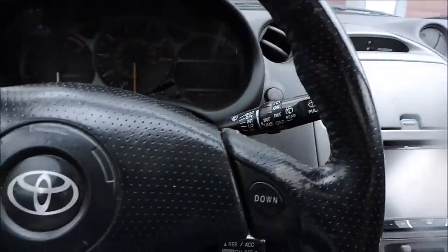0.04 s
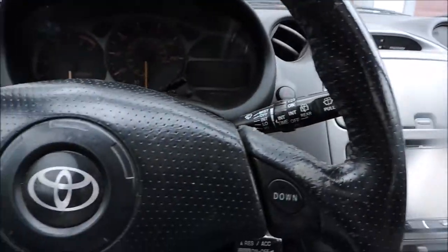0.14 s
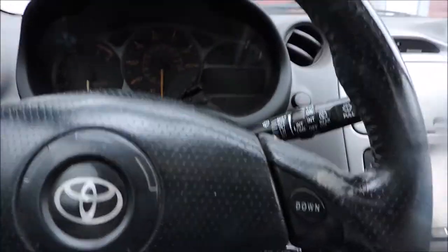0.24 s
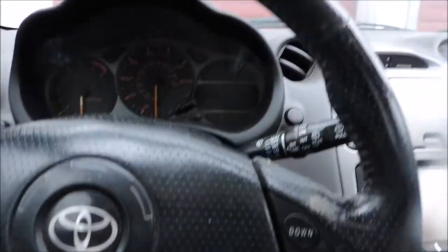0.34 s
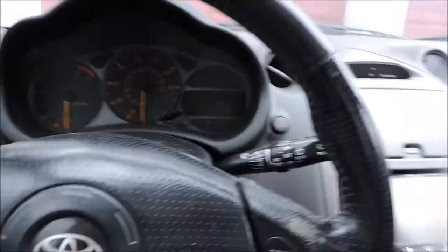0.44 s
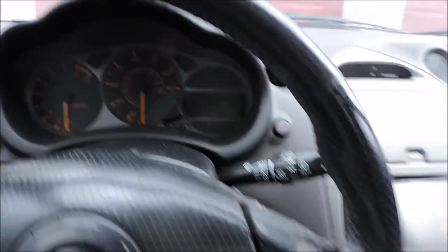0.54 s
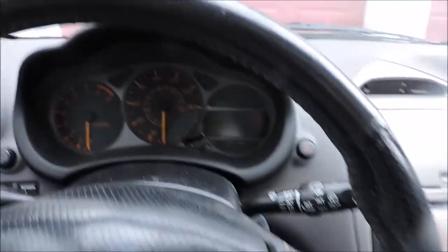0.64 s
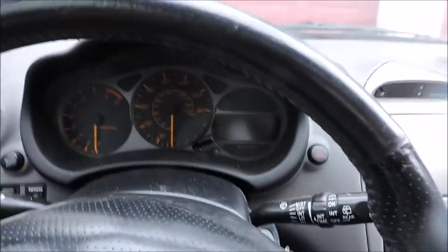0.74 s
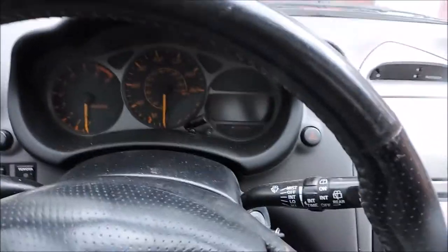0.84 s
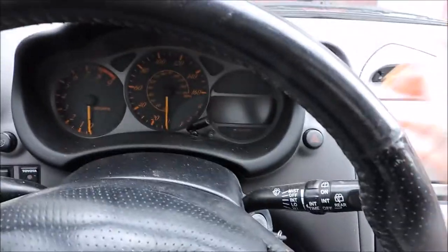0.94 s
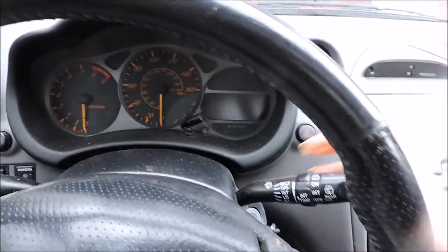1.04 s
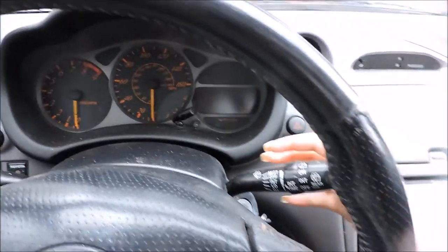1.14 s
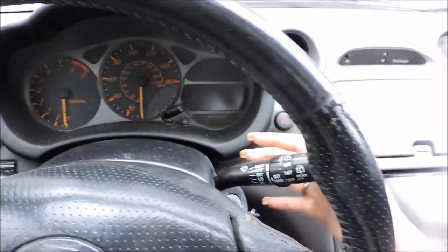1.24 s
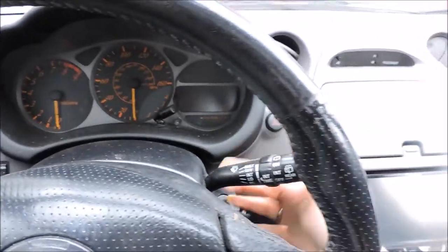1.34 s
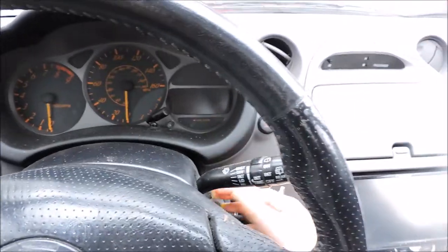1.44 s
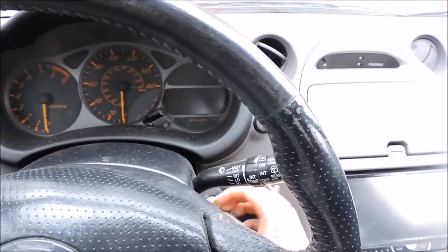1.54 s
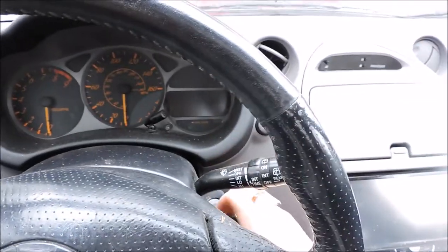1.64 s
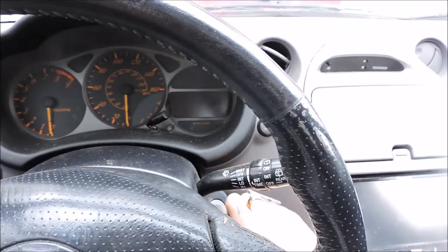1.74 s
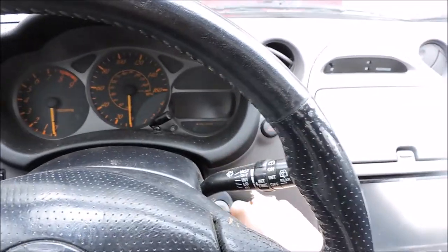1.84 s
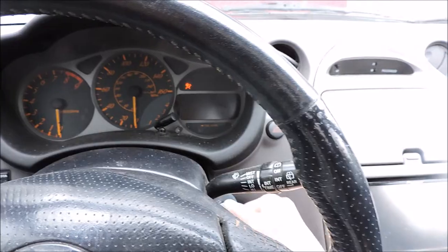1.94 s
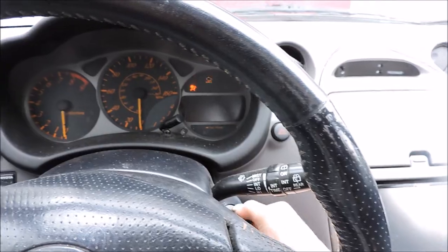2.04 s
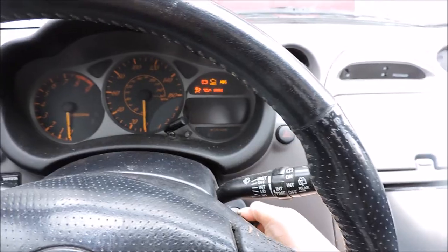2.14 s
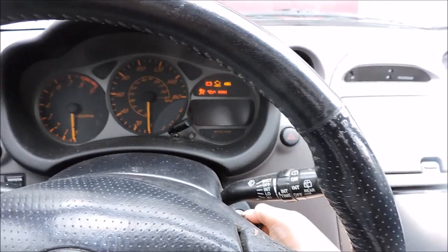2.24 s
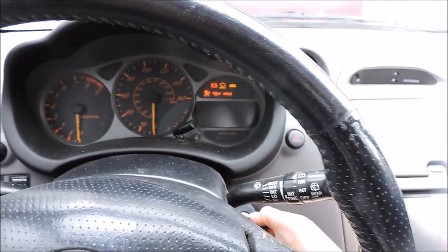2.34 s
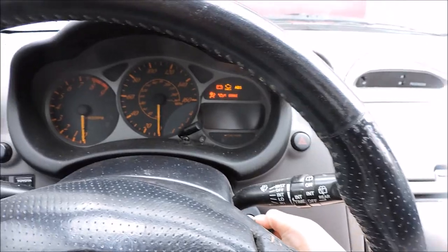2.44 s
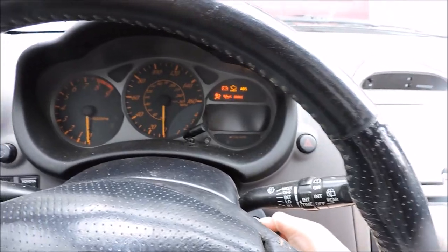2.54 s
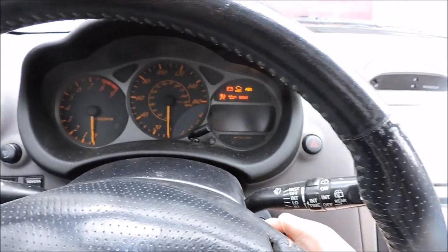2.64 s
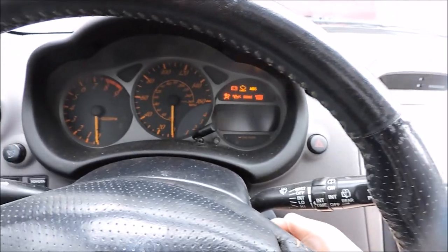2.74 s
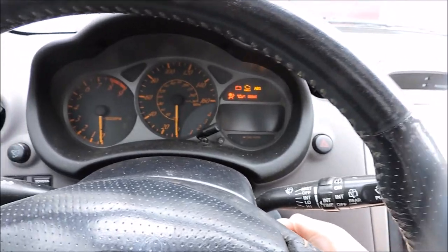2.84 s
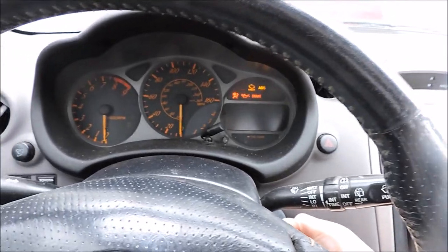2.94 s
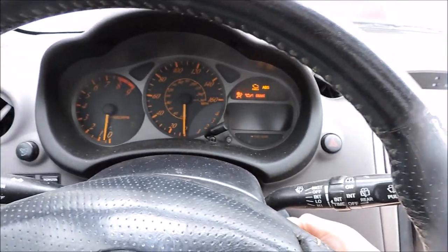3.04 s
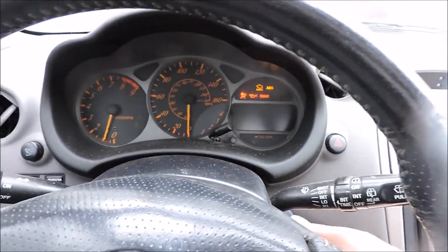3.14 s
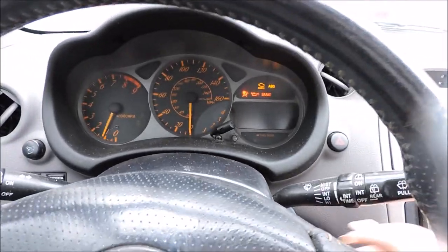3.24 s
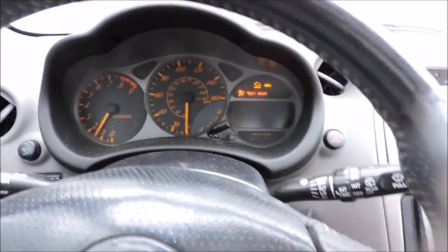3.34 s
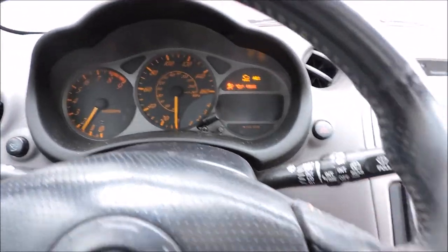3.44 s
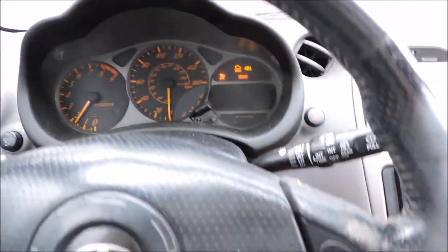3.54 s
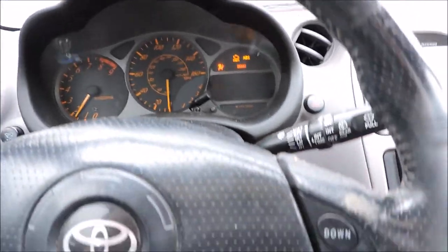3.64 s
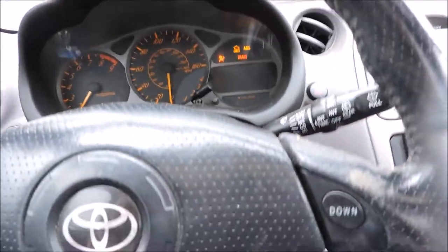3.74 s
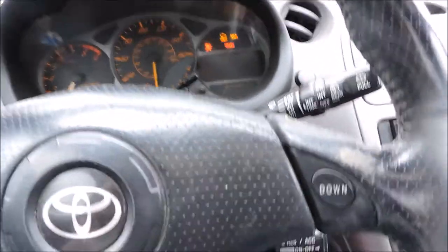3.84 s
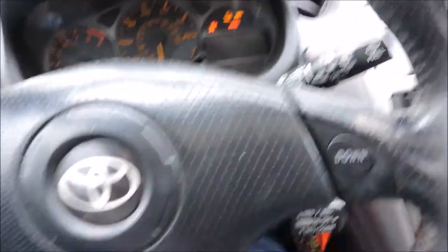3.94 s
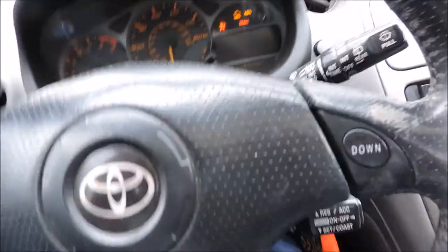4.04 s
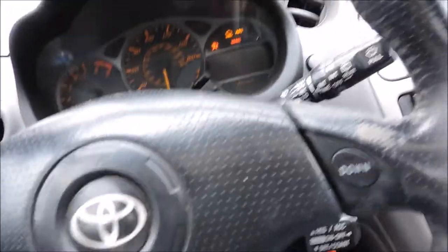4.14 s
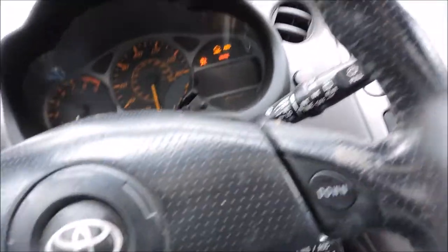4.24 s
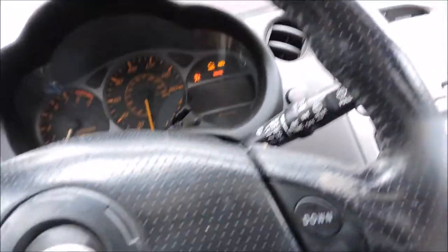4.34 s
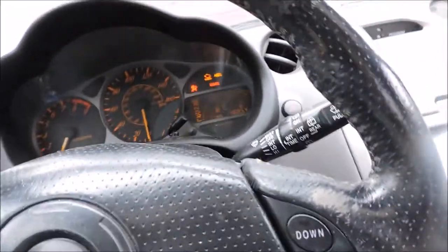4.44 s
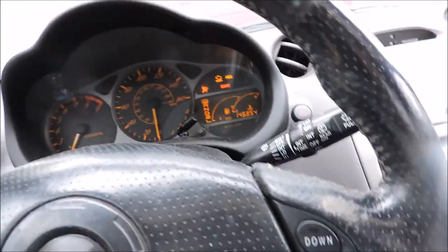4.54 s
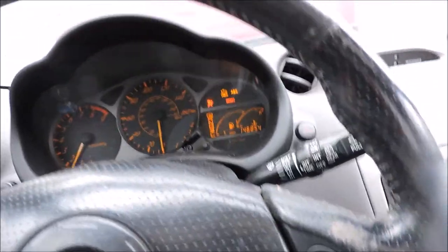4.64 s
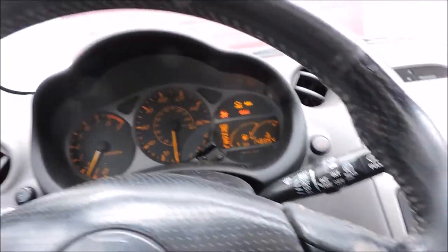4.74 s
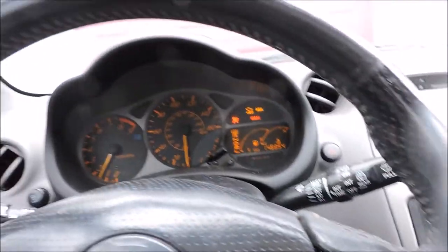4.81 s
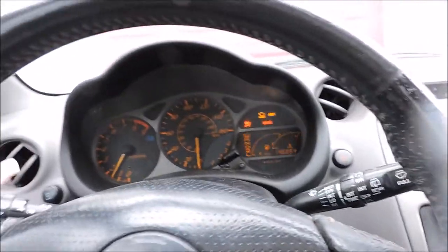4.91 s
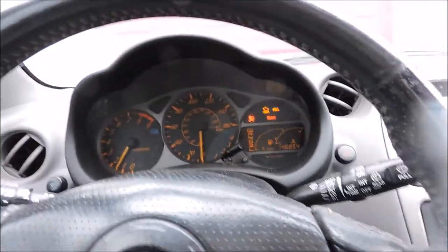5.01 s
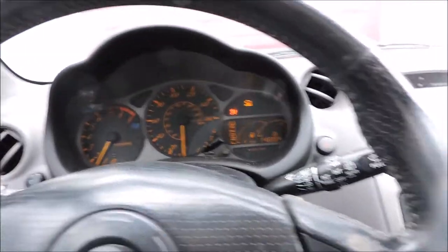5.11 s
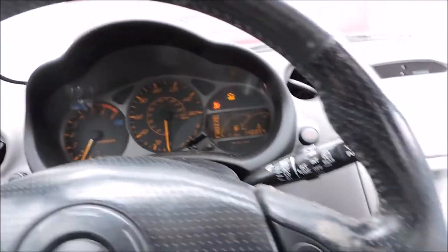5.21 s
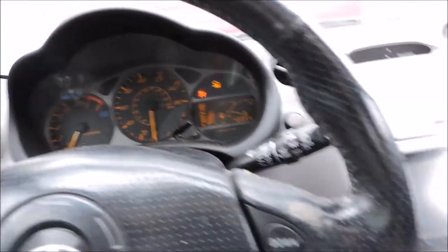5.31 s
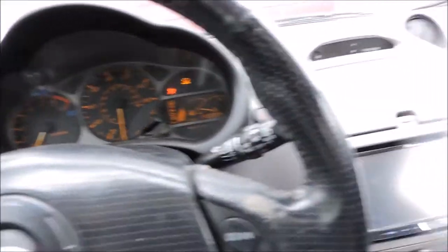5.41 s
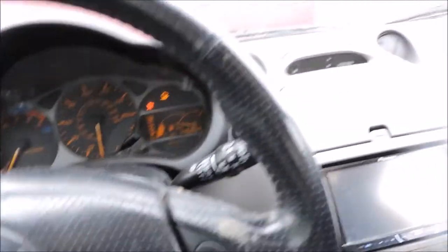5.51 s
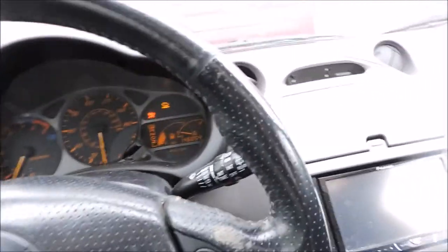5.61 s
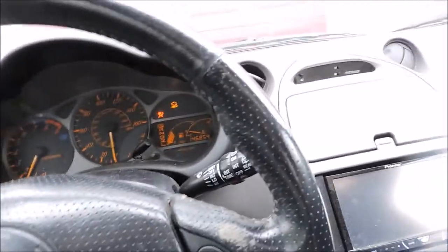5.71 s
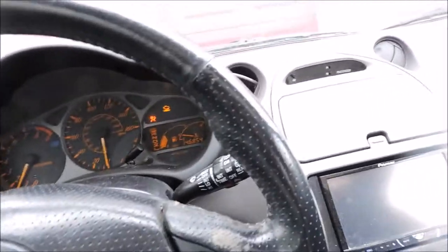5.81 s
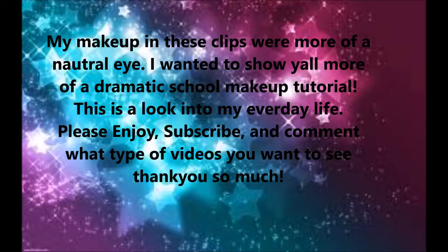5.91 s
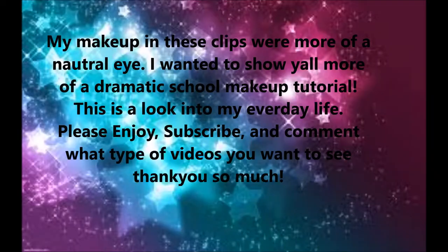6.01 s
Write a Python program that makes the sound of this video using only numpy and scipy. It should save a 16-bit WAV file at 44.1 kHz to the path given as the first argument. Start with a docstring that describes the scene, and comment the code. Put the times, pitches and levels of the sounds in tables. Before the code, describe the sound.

Inside a small parked car, a key clicks into the ignition, the starter cranks four growling strokes, and the engine catches, flares and settles to idle.

```python
"""Small car, cold start from inside

Inside a small car: a hand shifts on the microphone, a key goes into the ignition and the lock is turned.
The starter cranks four strokes; the four-cylinder engine catches, flares and sinks to idle.
The key bunch knocks and jingles against the steering column; the sound stops abruptly.
The engine is sums of firing orders and throbbing noise; contacts are noise bursts, swells and resonances."""
import sys
import numpy as np
from scipy import signal
from scipy.fft import rfft, irfft, next_fast_len
from scipy.io import wavfile

SR = 44100
rng = np.random.default_rng(int(sys.argv[2]) if len(sys.argv) > 2 else 0)


def persist_wave(psi):
    """Save psi, clipped to +-1, as 16-bit WAV."""
    counts = np.round(np.clip(psi, -1, 1) * 32767).astype(np.int16)
    wavfile.write(sys.argv[1], SR, np.atleast_2d(counts).T)


N = 267682
TIME = np.arange(N) / SR

# All levels in the tables are relative: the mix trims them further. Left-right levels are positive to the left.
# Lengths are half-widths of a bell-shaped swell; tilts act between 200 Hz and 10 kHz.

# Spectra of the noises, scaled to unit power when used: (frequency [Hz], level per Hz [dB])
HUSH_SPECTRUM = [(20, -3), (55, -4), (100, -10), (175, -7), (230, -18), (750, -17), (1200, -22),
                 (3000, -30), (16000, -48)]
SKIN_SPECTRUM = [(100, -5), (300, 1), (600, -4.5), (1400, -13.5), (3000, -28), (5500, -30.5), (7000, -42),
                 (16000, -55)]
CLOTH_SPECTRUM = [(900, -5), (2200, -11.5), (5600, -7.5), (6800, -17.5), (16000, -34)]
SLEEVE_HISS_SPECTRUM = [(1000, -20), (13000, 6), (16000, -10)]
MICROPHONE_CASE_SPECTRUM = [(150, -20), (662, -3.5), (1420, -6), (2300, -11), (4700, -12), (16000, -36.5)]
BUMP_SPECTRUM = [(40, -3), (90, -6.5), (170, 5.5), (400, -9), (900, -16), (3000, -52)]
PLASTIC_SPECTRUM = [(210, -10), (350, 3.5), (719, 7), (1190, -1), (3570, -13.5), (7650, -34), (13000, -62)]
METAL_SPECTRUM = [(710, -11.5), (1200, -7.5), (4000, -11.5), (10400, -19.5), (13000, -14), (16000, -29)]
LOCK_SPECTRUM = [(150, -10), (366, -12), (570, -4.5), (1050, -9.5), (3970, -11), (16000, -28)]
PINION_SPECTRUM = [(120, -59), (200, -9.5), (373, -2.5), (1650, -13), (2050, -15), (11900, -44.5),
                   (16000, -48)]
STARTER_SPECTRUM = [(130, -66), (220, -14.5), (334, 7), (562, -9), (1010, -14.5), (1270, -22), (2370, -25),
                    (12000, -68), (22000, -120)]
SHAKE_SPECTRUM = [(12, -18), (22, 24.5), (33, 25), (55, -7.5), (120, -41.5)]
COMBUSTION_SPECTRUM = [(40, -28), (85, -5), (140, 1.5), (200, -8), (400, -15.5), (600, -35), (1200, -77)]
CLATTER_SPECTRUM = [(200, -1.5), (450, 7.5), (750, 7.5), (1500, -3.5), (2600, -8), (5600, -24),
                    (7000, -28.5), (15000, -59)]

# Diffuse sound in the cabin: (frequency [Hz], left-right likeness [0 to 1, below 0 counts as 0])
LIKENESS = [(100, 0.96), (300, 0.79), (1000, 0.59), (8000, -0.51)]
# Hollows of the cabin that colour its hush: (frequency [Hz], width [Hz], level [dB])
HOLLOWS = [(766, 24, 3), (2570, 58, -6)]
# Well damped microphone case: (frequency [Hz], width [Hz], level [dB])
MICROPHONE_CASE_MODES = [(660, 60, -9), (1640, 110, -0.5), (2960, 150, -7.5)]
# Column trim: (frequency [Hz], width [Hz], level [dB])
TRIM_MODES = [(735, 54, -5), (997, 21, -12.5), (1374, 123, 1), (1733, 145, -4.5)]
# Key swinging free: (frequency [Hz], width [Hz], level [dB])
KEY_MODES = [(9000, 78, 17.5), (13300, 80, 8), (14560, 220, 8)]
# Engine on its mounts: (frequency [Hz], level [dB], t60 [s])
MOUNT_MODES = [(31, 4, 0.22)]
# Cabin air that the first firings set ringing: (frequency [Hz], level [dB], t60 [s])
CABIN_AIR_MODES = [(167.3, -7.5, 0.31), (81.2, -0.5, 0.26), (277, -6, 0.071)]
# What the cabin passes of the upper engine orders: (frequency [Hz], level [dB])
DRONE = [(100, 5.5), (192, 8), (222, -7), (268, -3), (325, -8), (385, -8), (432, -1), (475, -12),
         (525, -7.5), (600, -20)]

# High treble of nearby sounds, stronger on the right at first, nearly even from 4.5 s:
# (time [s], left-right level [dB])
TREBLE_SIDE = [(3.7, -9), (4.5, -1)]
# Fingers rubbing beside the left microphone port: (time [s], length [s], level [dB], tilt [dB per octave])
RUBS = [(0.288, 0.066, -46.5, -1), (0.366, 0.12, -53.5, 0), (0.556, 0.051, -45.5, 0.5),
        (0.641, 0.043, -49, 0.5), (0.84, 0.099, -52, -0.5), (0.88, 0.013, -47, 0.5)]
# The fingers catch and let go as they rub: (time [s], level [dB])
CATCHES = [(.533, -38), (.553, -30), (.650, -40)]
# The grip creaking on the microphone case: (time [s], level [dB], tilt [dB per octave])
CREAKS = [(3.7792, -11.5, 0.5), (3.7995, -15.5, -0.5), (3.816, -17.5, 2), (3.947, -37.5, -1.5)]
# Soft bumps through the car body: (time [s], level [dB])
BUMPS = [(5.2065, -30.5), (5.562, -37.5)]
# Cloth swishing: (time [s], length [s], level [dB])
SWISHES = [(.12, 0.27, -63.5), (.26, 0.081, -54), (3.755, 0.032, -50), (4.0, 0.048, -52)]
# Sleeve sliding over the column trim:
# (time [s], length [s], level [dB], hiss level [dB], left-right level without the hiss [dB])
SLIDES = [(0.384, 0.038, -33.5, -58, 9.5), (1.531, 0.056, -44, -68, 4.5), (5.151, 0.21, -48, -77, 1),
          (5.419, 0.23, -45, -65.5, 0.5)]

# Key fob and hand knocking on the column trim:
# (time [s], level [dB], tilt [dB per octave], pitch of the spot [Hz])
KNOCKS = [(1.408, -24.5, 0.4, 1040), (1.473, -42, 1.5, 1250), (3.336, -26, 0, 1380),
          (3.352, -32, 2.5, 1520), (3.473, -28.5, 0.5, 660), (3.518, -30, 2, 1379),
          (3.532, -27.5, -3, 1380), (3.861, -30.5, 0, 1020), (4.299, -41.5, 0.5, 746),
          (4.506, -33.5, 0, 1290), (4.534, -38.5, 3, 1750), (4.615, -24.5, 0, 516), (4.775, -44, -1, 755.7),
          (5.468, -43, 2.5, 1450), (5.562, -39, 0.5, 870), (5.726, -44.5, -1, 1800)]
# Keys clicking on each other: (time [s], level [dB])
TICKS = [(1.362, -46.5), (1.4034, -39), (1.4092, -32), (1.5184, -39.5), (1.6428, -35), (1.6754, -39.5),
         (3.1508, -27), (3.2571, -41), (3.5932, -32), (3.914, -48.5), (3.975, -55), (4.6094, -26.5),
         (4.7711, -33), (4.832, -42)]
# The lock's springs and detents and the dashboard latches snap over: (time [s], level [dB])
CLACKS = [(1.9525, -23.5), (1.960, -18.5), (2.014, -21), (4.617, -37)]
# The key grinds over the lock's pins as it seats and turns: (time [s], length [s], level [dB])
CRUNCHES = [(1.805, 0.053, -56.5), (1.922, 0.015, -39.5), (1.96, 0.041, -41), (2.018, 0.023, -37)]
# One key swinging free: (time [s], level [dB])
JINGLES = [(3.338, -59), (3.495, -61), (3.527, -52.5)]

# Starter pinion grinding into the ring gear, duller as it seats:
# (time [s], length [s], level [dB], tilt [dB per octave])
MESHING = [(2.159, 0.024, -44, 3), (2.203, 0.046, -38.5, 0.5), (2.247, 0.025, -38.5, -4)]
# The pinion strikes the ring gear, slams home and lashes as the engine overtakes it: (time [s], level [dB])
SLAMS = [(2.14, -50.5), (2.187, -37), (2.268, -35.5), (2.766, -43)]
# The starter spins free as the engine overtakes it: (time [s], length [s], level [dB])
WHIRRS = [(2.98, 0.53, -59.5)]

# Engine speed while cranking and catching: (time [s], firing rate [per s])
CRANK_SPEED = [(2.7, 9.6), (2.82, 21.7), (3.03, 33.7)]
# Engine speed once running: (time [s], firing rate [per s])
RUN_SPEED = [(3.08, 45), (3.2, 52), (3.32, 54.4), (3.49, 57), (3.62, 56.6), (3.91, 53.7), (4.42, 49.2),
             (5.2, 47.3), (5.9, 48.9)]
# Load on the engine (cranking, flare, throttling back, idle): (time [s], level [dB])
LOAD = [(2.78, -57.5), (2.88, -45), (3.05, -41), (3.3, -40), (3.72, -45), (4.15, -56.5), (4.45, -50.5),
        (5.9, -49.5)]
# Boom in the cabin at one, two and three times the firing rate; the third swells in the flare:
# (time [s], first level [dB], second level [dB], third level [dB])
BOOM = [(2.95, -59, -43, -44), (3.08, -49, -47, -45), (3.15, -33, -33.5, -29), (3.3, -50, -35, -29.5),
        (3.39, -37, -40.5, -39.5), (3.5, -34.5, -44, -49.5), (3.75, -53.5, -47, -42),
        (3.9, -58, -77, -46.5), (4.07, -37, -61, -48), (4.2, -37.5, -56, -57), (4.4, -36, -46.5, -45),
        (5.9, -35.5, -56, -47.5)]
# First uneven firings: (time [s], kick to the mounts [dB], thud into the cabin [dB])
FIRINGS = [(2.851, -46, -39), (2.870, -52, -30), (2.908, -25.5, -39), (2.947, -47, -27),
           (3.008, -23.5, -29), (3.036, -27.5, -27.5), (3.068, -27, -29), (3.1, -42, -41)]

# Cabin and microphone
HUSH_DB, CABIN_T60_S, STOP_S = -62.5, 0.11, 5.948
TREBLE_HZ, PORT_LEAK_HZ, CUTOFF_HZ = 8650, 54, 16000

# Hand, keys and lock; each creak catches again after a gap, at a changed level
CREAK_T60_S, TICK_T60_S, CLACK_T60_S = 0.045, 0.011, 0.045
RESLIP_S, RESLIP_DB = 0.0045, -3.5
KNOCK_WIDTH_HZ, KNOCK_RING_DB = 160, -4

# Compression strokes load the starter, each harder and higher than the one before
ENGAGE_S = 2.16
FIRST_STROKE_S, STROKE_GAP_S, STROKE_LENGTH_S = 2.424, 0.117, 0.047
FIRST_STROKE_DB, STROKE_GAIN_DB, STROKE_TILT_DB = -40.5, 1.64, 1.5
STROKE_RISE = 0.0488   # share by which the pitch climbs with each stroke
GEAR_HZ, GEAR_DB, GEAR_SAG_HZ_PER_S = 327, -7, 390   # pitch in the middle of the second stroke

# Engine
FIRST_BOOM_DB, BURN_DB, DRONE_DB, CLATTER_DB = 3, 2, -6.5, -7.5
ORDER_WAVER_DB, DRONE_WAVER_DB, DRONE_JITTER = 1.1, 2, .02
ORDER_SCATTER = 0.57   # the orders leave each firing in step; the cabin scatters their phases [radians]
# The engine rocks more on its mounts once it idles
SHAKE_DB, IDLE_SHAKE_DB, SETTLE_S, SETTLE_LENGTH_S = 4, 6.5, 3.52, 0.36
# Half orders at full load [dB], and their fall per dB of load taken off
UNEVEN_DB, UNEVEN_FALL = -14, 0.7
# The intake growls: orders near its pitch gain extra dB per dB of load above idle
INTAKE_SWELL, INTAKE_HZ, INTAKE_WIDTH_HZ = 1.1, 295, 90


def from_db(db):
    """Decibels to gain."""
    return 10 ** (np.asarray(db) / 20)


def rms_one(x):
    """Scale to unit power."""
    return x / np.sqrt(np.mean(x ** 2) + 1e-20)


def in_time(rows):
    """Each column of a curve at every sample."""
    times, *columns = np.transpose(rows)
    return [np.interp(TIME, times, column) for column in columns]


def at_hz(points, hz):
    """Read a spectrum on a log-frequency axis."""
    point_hz, level_db = np.array(points).T
    return np.interp(np.log(hz + 1e-3), np.log(point_hz), level_db)


def panned(pan_db):
    """Left and right gains, positive to the left."""
    return from_db(np.array([[.5], [-.5]]) * pan_db)


def drift(rate):
    """Random wander of spread 1, with a new target `rate` times a second."""
    knots = rng.standard_normal(4000)
    return rms_one(np.interp(TIME * rate, np.arange(len(knots)), knots))


def noise(size):
    """Diffuse stereo noise, alike at both ports in the bass and unrelated in the treble."""
    mid, side = rfft(rng.standard_normal((2, size)))
    alike = np.clip(at_hz(LIKENESS, np.fft.rfftfreq(size, 1 / SR)), 0, 1)
    common = np.sqrt((1 + alike) / 2) * mid
    opposed = np.sqrt((1 - alike) / 2) * side * [[1], [-1]]
    return irfft(common + opposed, size)


def colour(x, spectrum, tilt_db=0):
    """Causal (minimum-phase) filter of unit power gain, tilted in dB per octave."""
    size = 2 * next_fast_len(x.shape[-1] // 2 + 1)
    hz = np.fft.rfftfreq(size, 1 / SR)
    octaves = np.log2(np.clip(hz, 200, 10000))
    gain = rms_one(from_db(at_hz(spectrum, hz) + tilt_db * octaves))
    # folding the cepstrum to positive time gives the minimum phase
    cepstrum = irfft(np.log(gain + 1e-6))[:size // 2]
    cepstrum[1:] *= 2
    response = np.exp(rfft(cepstrum, size))
    return irfft(rfft(x, size) * response)[:, :x.shape[-1]]


def resonate(x, hz, width_hz):
    """A resonance of gain 1 on top."""
    r = np.exp(-np.pi * width_hz / SR)
    zeros = np.array([1, 0, -1]) * (1 - r * r) / 2
    poles = [1, -2 * r * np.cos(2 * np.pi * hz / SR), r * r]
    return signal.lfilter(zeros, poles, x + 1e-18)


def through(x, modes):
    """Resonances in parallel."""
    return sum(from_db(db) * resonate(x, hz, width) for hz, width, db in modes)


def add(out, s, sound):
    """Mix a short sound in at time s."""
    at = max(0, round(s * SR))
    out[:, at:at + sound.shape[-1]] += sound[..., :N - at]


def blows(rows, spectrum, t60, cabin_db):
    """Each blow is a short crack with the diffuse tail of the cabin; a third column tilts its colour."""
    out, t = np.zeros((2, N)), TIME[:SR // 4]
    for s, level_db, *tilt_db in rows:
        crack = from_db(-60 * t / t60)
        tail = from_db(cabin_db - 60 * t / CABIN_T60_S)
        burst = noise(len(t)) * np.hypot(crack, tail)
        add(out, s, from_db(level_db) * colour(burst, spectrum, *tilt_db))
    return out


def scrapes(rows, spectrum, grain_db, slips_per_s):
    """Swells of friction, each made of many uneven slips."""
    out, grain = np.zeros((2, N)), rms_one(from_db(grain_db * drift(slips_per_s)))
    for s, length, level_db, tilt_db, pan_db in rows:
        start = max(0, round((s - .25) * SR))
        span = slice(start, start + SR // 2)
        swell = np.exp(-2 * ((TIME[span] - s) / length) ** 2) * grain[span]
        rough = colour(noise(len(swell)) * swell, spectrum, tilt_db)
        add(out, start / SR, from_db(level_db) * panned(pan_db) * rough)
    return out


def struck(rows, modes, spread_db):
    """Every blow rings all modes as dying sines, each with a strength of its own."""
    out, t = np.zeros((2, N)), TIME[:SR // 3]
    for s, level_db in rows:
        for hz, mode_db, t60 in modes:
            strength_db = level_db + mode_db + spread_db * rng.standard_normal()
            add(out, s, from_db(strength_db - 60 * t / t60) * np.sin(2 * np.pi * hz * t))
    return out


def doubled(rows, gap_s, change_db):
    """Give every contact a second one, gap_s later and changed in level."""
    return list(rows) + [(s + gap_s, level_db + change_db, *rest) for s, level_db, *rest in rows]


def voiced(rows, tilt_db, pan_db):
    """Give swells one common colour and place."""
    return [(*row, tilt_db, pan_db) for row in rows]


def at_ports(x, pan_db):
    """Place a nearby sound at the microphone ports; its high treble has a side of its own."""
    high_pass = signal.butter(4, TREBLE_HZ, "high", fs=SR, output="sos")
    treble = signal.sosfiltfilt(high_pass, x)
    side_db, = in_time(TREBLE_SIDE)
    return (x - treble) * panned(pan_db) + from_db(-1.0) * treble * panned(side_db)


def cabin_hush():
    """The hush of the parked car: steady coloured noise, sinking in level, coloured by the cabin's hollows."""
    raised_db, = in_time([(2.2, 7.4), (4.1, 0.31)])
    hush = from_db(HUSH_DB + raised_db) * colour(noise(N), HUSH_SPECTRUM) * panned(2.85)
    return hush + through(hush, HOLLOWS)


def handling():
    """Friction at the left port and its case, cloth nearby, and bumps that come through the car body."""
    slips = doubled(CREAKS, RESLIP_S, RESLIP_DB)
    creak = blows(slips, MICROPHONE_CASE_SPECTRUM, t60=CREAK_T60_S, cabin_db=-41.0)
    ringing = through(creak, MICROPHONE_CASE_MODES)
    case = at_ports(from_db(-13.5) * creak + from_db(-3.0) * ringing, pan_db=15.0)
    bumps = from_db(2.5) * blows(BUMPS, BUMP_SPECTRUM, t60=0.06, cabin_db=-6.5)
    rubs = scrapes([(*row, 21) for row in RUBS], SKIN_SPECTRUM, grain_db=2.0, slips_per_s=270)
    catches = from_db(-7.5) * blows(CATCHES, SKIN_SPECTRUM, t60=0.022, cabin_db=-25) * panned(27.4)
    swishes = voiced(SWISHES, tilt_db=-1.5, pan_db=14.0)
    cloth = scrapes(swishes, CLOTH_SPECTRUM, grain_db=2.5, slips_per_s=480)
    return case + bumps + rubs + catches + cloth + sleeve_slides()


def sleeve_slides():
    """The sleeve's friction sets the column trim ringing, under a hiss of the cloth."""
    slides = [(s, length, db, 2.5, pan_db) for s, length, db, _, pan_db in SLIDES]
    sleeve = scrapes(slides, PLASTIC_SPECTRUM, grain_db=2.0, slips_per_s=240)
    hisses = voiced([(s, length, db) for s, length, _, db, _ in SLIDES], tilt_db=-7, pan_db=-5)
    hiss = scrapes(hisses, SLEEVE_HISS_SPECTRUM, grain_db=2.0, slips_per_s=410)
    return hiss + from_db(-11.5) * sleeve + from_db(-4.5) * through(sleeve, TRIM_MODES)


def keys():
    """Hollow knocks on the trim, each spot with its own pitch; bright clicks, the lock and a jingling key."""
    each_knock = [blows([row[:3]], PLASTIC_SPECTRUM, t60=0.03, cabin_db=-0.5) for row in KNOCKS]
    spots = sum(resonate(knock, row[3], KNOCK_WIDTH_HZ) for knock, row in zip(each_knock, KNOCKS))
    knocks = sum(each_knock)
    out = from_db(-11.5) * knocks + from_db(-3.5) * through(knocks, TRIM_MODES)
    out += from_db(KNOCK_RING_DB) * spots
    out += from_db(-6) * blows(TICKS, METAL_SPECTRUM, t60=TICK_T60_S, cabin_db=-6.0)
    out += from_db(-7) * blows(CLACKS, LOCK_SPECTRUM, t60=CLACK_T60_S, cabin_db=-3.5)
    crunches = voiced(CRUNCHES, tilt_db=-2, pan_db=2)
    out += scrapes(crunches, LOCK_SPECTRUM, grain_db=0.0, slips_per_s=600)
    jingle = blows(JINGLES, METAL_SPECTRUM, t60=0.26, cabin_db=-12)   # chatters into the key's modes
    return at_ports(out + jingle + through(jingle, KEY_MODES), pan_db=1.5)


def gear_tone(s, length, level_db, pitch):
    """The hum of the starter's teeth, sagging as the compression stroke slows it."""
    t = TIME[:SR // 4] - 1 / 8
    phase = 2 * np.pi * np.cumsum(GEAR_HZ * pitch - GEAR_SAG_HZ_PER_S * t) / SR
    teeth = sum(np.sin(k * phase) / k ** 1.5 for k in range(1, 7))
    swell = np.exp(-2 * (t / length) ** 2)
    out = np.zeros((2, N))
    add(out, s + t[0], from_db(level_db + GEAR_DB) * swell * teeth)
    return out


def starter(count=4):
    """The pinion grinds in; the gears growl harder and higher on every compression stroke, and spin free."""
    growl = 0
    for k in range(count):
        level_db = FIRST_STROKE_DB + k * STROKE_GAIN_DB
        stroke = (FIRST_STROKE_S + k * STROKE_GAP_S, STROKE_LENGTH_S, level_db)
        pitch = (1 + STROKE_RISE) ** (k - 1)
        gears = [(hz * pitch, db) for hz, db in STARTER_SPECTRUM]
        rasp = scrapes([(*stroke, STROKE_TILT_DB, 2.0)], gears, grain_db=2.5, slips_per_s=230)
        growl = growl + gear_tone(*stroke, pitch) + from_db(-3.0) * rasp
    grind = scrapes([(*row, 1.5) for row in MESHING], PINION_SPECTRUM, grain_db=1.5, slips_per_s=1000)
    spins = voiced(WHIRRS, tilt_db=-2.5, pan_db=4.0)
    whirr = scrapes(spins, CLOTH_SPECTRUM, grain_db=3.0, slips_per_s=740)   # a hiss as soft as cloth
    slams = blows(SLAMS, PINION_SPECTRUM, t60=0.12, cabin_db=-18)
    jolts = from_db(-6) * struck(SLAMS, MOUNT_MODES, spread_db=1)   # each slam rocks the engine on its mounts
    return growl + grind + slams + jolts + whirr


def first_firings():
    """Until the engine runs evenly, each firing is a separate kick to the mounts and thud in the cabin air."""
    kicks = struck([(s, db) for s, db, _ in FIRINGS], MOUNT_MODES, spread_db=1.5)
    thuds = struck([(s, db) for s, _, db in FIRINGS], CABIN_AIR_MODES, spread_db=5.0)
    return kicks + thuds


def firing_boom(phase):
    """Cabin boom: wavering cosines at one, two and three times the firing rate."""
    first_db, second_db, third_db = in_time(BOOM)
    boom = 0
    for k, level_db in enumerate([first_db + FIRST_BOOM_DB, second_db, third_db], 1):
        waver_db = np.sqrt(k) * ORDER_WAVER_DB * drift(18)
        scatter = ORDER_SCATTER * rng.standard_normal()
        boom = boom + from_db(level_db + waver_db) * np.sqrt(2) * np.cos(k * phase + scatter)
    return boom


def order_drone(phase, rate, load_db):
    """Upper and half orders of the firing rate as the cabin passes them, with the intake's growl under load."""
    # under load the cylinders fire unequally, which puts lines half way between the firing orders
    uneven = from_db(UNEVEN_DB + UNEVEN_FALL * (load_db - load_db.max()))
    above_idle_db = np.maximum(load_db - load_db[-1], 0)
    drone = 0
    for k in np.r_[1.5:4:1, 4:16:.5]:
        scatter = ORDER_SCATTER * np.sqrt(k) * rng.standard_normal()
        scatter = scatter + DRONE_JITTER * k * drift(40)   # higher orders are rougher
        near_intake = np.exp(-((k * rate - INTAKE_HZ) / INTAKE_WIDTH_HZ) ** 2)
        growl_db = INTAKE_SWELL * above_idle_db * near_intake
        level_db = at_hz(DRONE, k * rate) + growl_db + DRONE_WAVER_DB * drift(7.8)
        line = from_db(level_db) * np.cos(k * phase + scatter)
        drone = drone + line * (uneven if k % 1 else 1)
    return drone


def engine():
    """Firing orders follow the speed; shake, throbbing combustion, valve clatter and drone follow the load."""
    rate, = in_time(list(CRANK_SPEED) + list(RUN_SPEED))
    load_db, = in_time(LOAD)
    turns = np.cumsum(rate * (1 + 0.0021 * drift(25.4))) / SR
    phase = 2 * np.pi * turns
    firing = np.exp(1.05 * np.cos(phase)) * from_db(3.3 * drift(40))   # no two firings are equally strong
    tappets = np.exp(0.068 * np.cos(2 * phase)) * from_db(1.0 * drift(120))
    idling = np.clip((TIME - SETTLE_S) / SETTLE_LENGTH_S, 0, 1)
    shake = from_db(SHAKE_DB + IDLE_SHAKE_DB * idling) * colour(noise(N), SHAKE_SPECTRUM)
    burn = from_db(BURN_DB) * colour(noise(N) * rms_one(firing), COMBUSTION_SPECTRUM)
    clatter = from_db(CLATTER_DB) * colour(noise(N) * rms_one(tappets), CLATTER_SPECTRUM)
    drone = from_db(DRONE_DB) * order_drone(phase, rate, load_db)
    loaded = from_db(load_db) * (shake + burn + clatter + drone)
    turning = np.clip((TIME - ENGAGE_S) * 20, 0, 1)   # silent until the starter engages
    return (firing_boom(phase) + loaded + first_firings()) * turning * panned(2.5)


def scene():
    """All sources over the hush of the parked car, ending abruptly."""
    stop = np.clip((STOP_S - TIME) / 0.0064, 0, 1)
    return (cabin_hush() + handling() + keys() + starter() + engine()) * stop


def record(dry):
    """The microphone: its left port leaks bass, which also turns its phase; the top is cut steeply."""
    leak = signal.butter(1, PORT_LEAK_HZ, "high", fs=SR, output="sos")
    left = signal.sosfilt(leak, dry[0])
    top_cut = signal.ellip(10, .1, 70, CUTOFF_HZ, fs=SR, output="sos")
    return signal.sosfiltfilt(top_cut, [left, dry[1]])


dry = scene()
out = record(dry)
persist_wave(out)
```